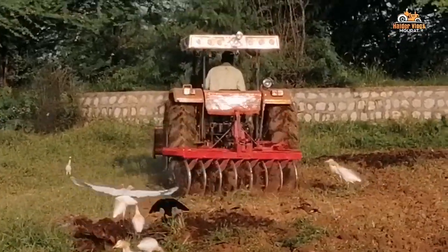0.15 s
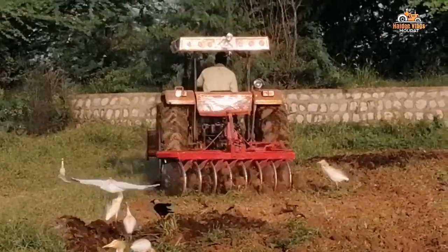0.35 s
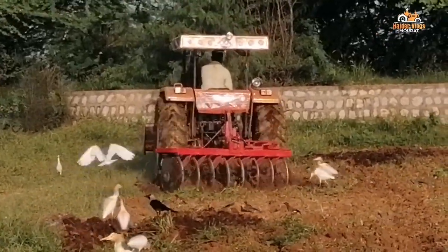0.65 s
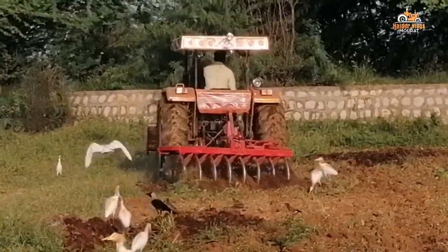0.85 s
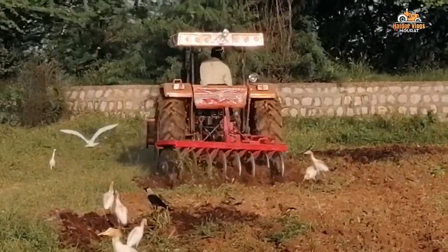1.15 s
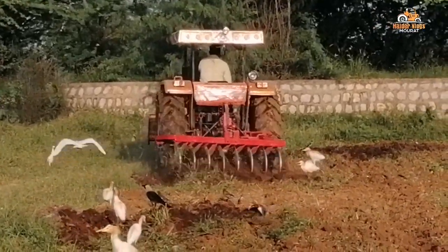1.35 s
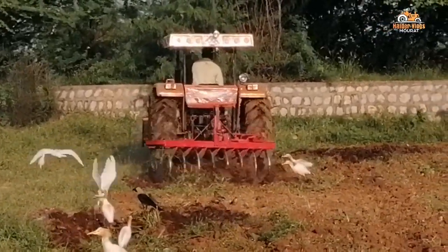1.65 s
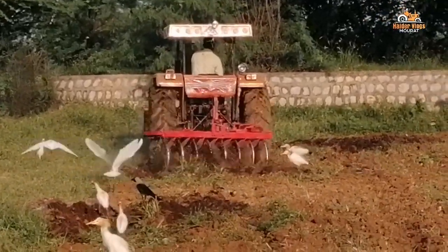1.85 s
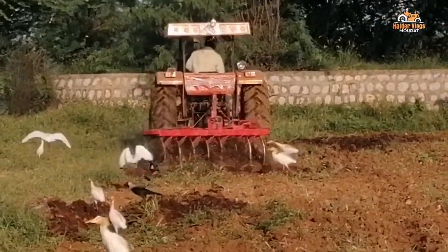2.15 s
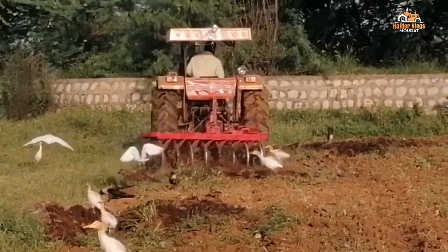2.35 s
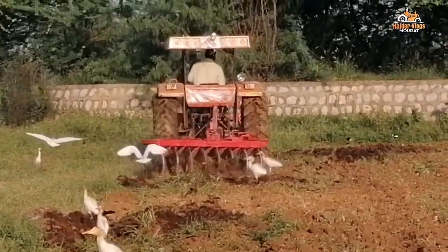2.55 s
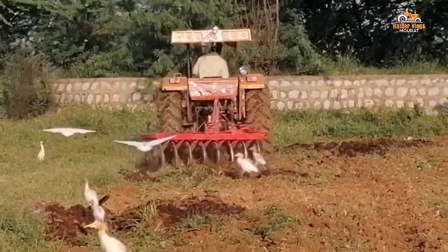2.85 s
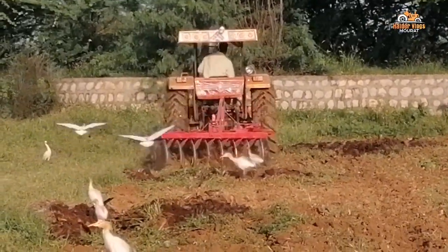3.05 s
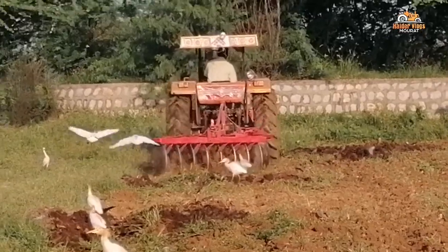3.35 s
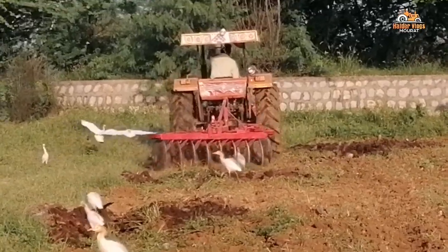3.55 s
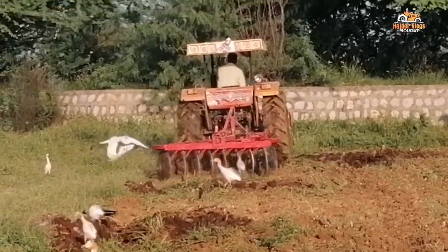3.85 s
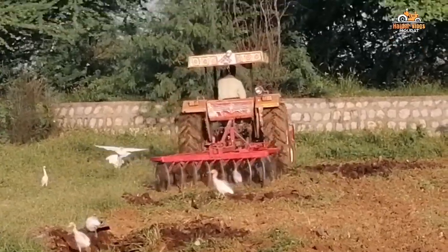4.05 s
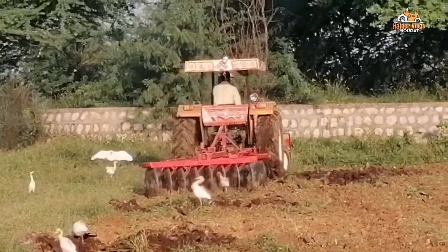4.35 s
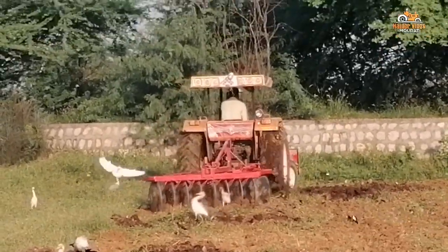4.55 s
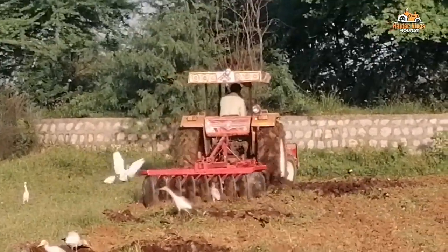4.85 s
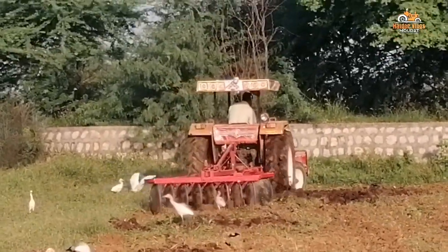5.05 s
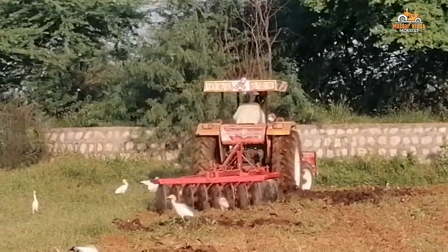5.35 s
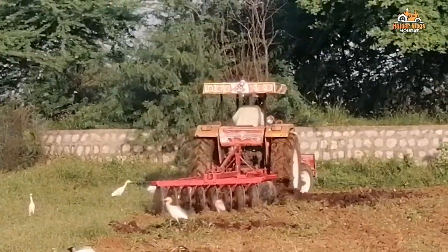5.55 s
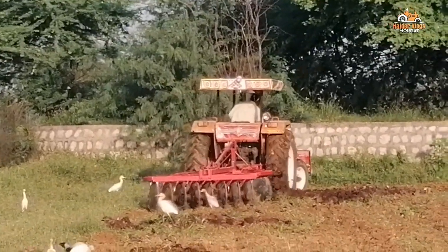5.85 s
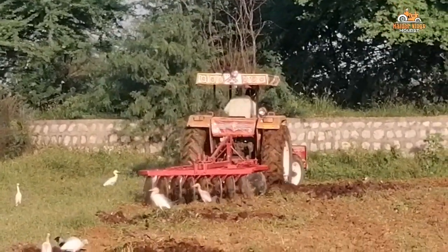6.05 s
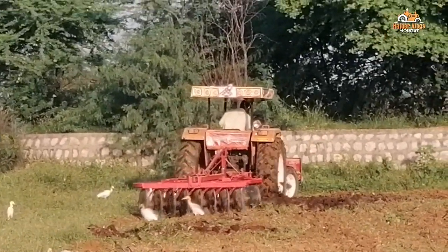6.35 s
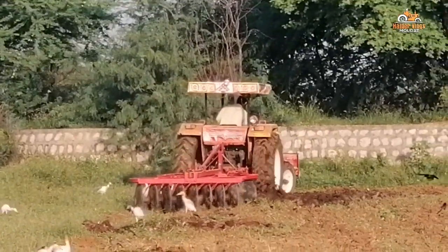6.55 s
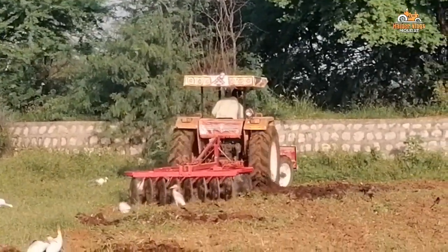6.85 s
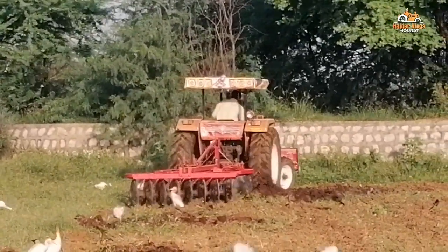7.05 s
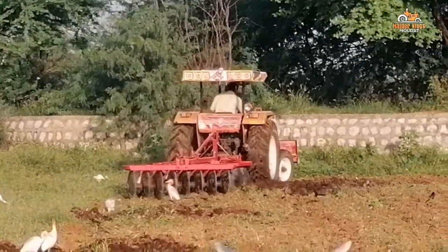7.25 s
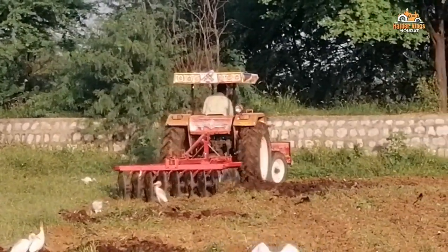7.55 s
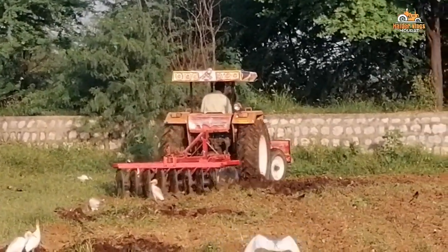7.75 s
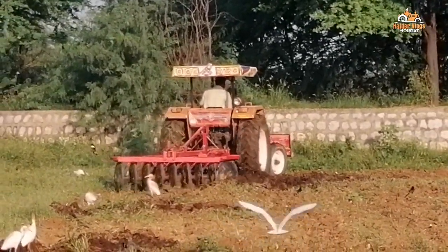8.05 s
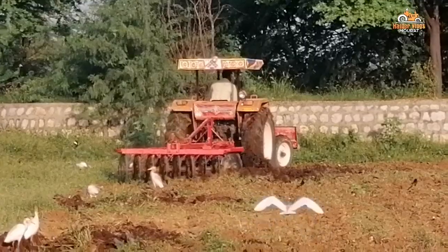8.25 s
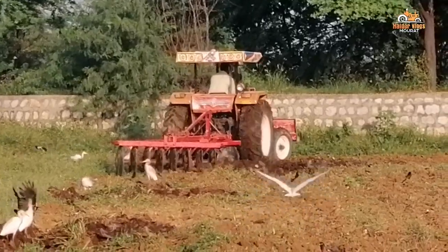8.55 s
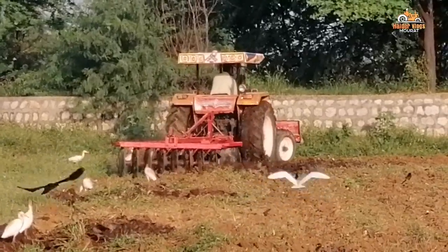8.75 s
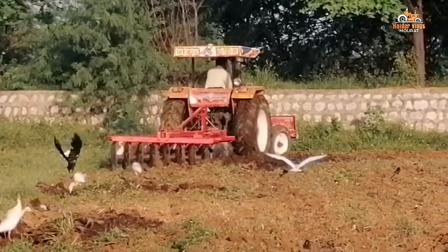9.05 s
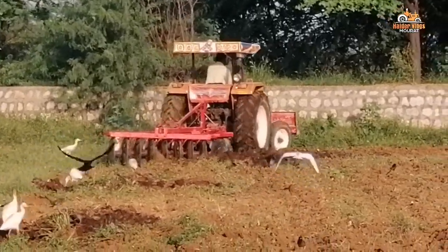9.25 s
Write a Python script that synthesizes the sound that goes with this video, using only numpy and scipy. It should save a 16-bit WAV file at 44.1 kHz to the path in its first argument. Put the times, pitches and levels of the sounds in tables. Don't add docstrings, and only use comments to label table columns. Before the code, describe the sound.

From 0 to about 9.4 seconds a three-cylinder diesel tractor works under load in an open field, dragging a disk harrow. A deep hum at roughly 39 firings per second slowly throbs against its echo from a wall, over soft low rumble, uneven block knocks and a rough roar puffing with each firing, with light hiss above. Small distant birds chirp sparsely between 0.1 and 2.8 seconds, short hoarse slides. At 4.5 to 4.7 seconds the disks crunch grittily over stones, with small pings and a bright clank, and the frame gives a soft low thud. The tractor gradually turns side-on from 4.6 to 7.4, its hiss slightly brighter. A nearer, harsh multi-syllable bird call comes around 6.5. Near 8 seconds the engine eases, sinking in pitch and roar, then pulls again from 8.9, slower. Handheld camera stereo sounds midrange-heavy, uneven between sides.

```python
import sys
import numpy as np
from scipy import signal
from scipy.fft import rfft, irfft, next_fast_len
from scipy.io import wavfile
from scipy.ndimage import map_coordinates

SR = 44100
rng = np.random.default_rng(int(sys.argv[2]) if len(sys.argv) > 2 else 0)


def invert_db(level):
    return 10 ** (np.asarray(level, dtype=float) / 20)


def waveform_to_disk(signal):
    frames = np.transpose(np.atleast_2d(signal))
    scaled = np.clip(frames, -1, 1) * 32767
    samples = np.round(scaled).astype(np.int16)
    wavfile.write(sys.argv[1], SR, samples)


N = 414528
CYLINDERS = 3


def evened(x):
    return x / np.sqrt(np.mean(x ** 2) + 1e-20)


def read(points, hz):
    f, value = np.transpose(points)
    return np.interp(np.log(hz + 1), np.log(f + 1), value)


def columns(rows, t):
    s, *rest = np.transpose(rows)
    return [np.interp(t, s, c) for c in rest]


def drift(top_hz, size=N):
    t = np.linspace(0, N / SR, 6000)
    slow = map_coordinates(rng.standard_normal(6000), [t * 2 * top_hz], order=3, mode="wrap")
    return np.interp(np.linspace(0, N / SR, size), t, evened(slow))


def resonate(x, hz, width):
    r = np.exp(-np.pi * width / SR)
    return 2 * signal.lfilter([1 - r], [1, -r * np.exp(2j * np.pi * hz / SR)], x).real


# t/s, shortening/cm
WALL = [(0, -50), (.15, 0), (.7, 341), (1.95, 621), (2.85, 913), (4.0, 1217), (5.6, 1495), (6.3, 1566),
        (7.0, 1630), (7.7, 1717), (7.9, 1775), (8.15, 1896), (8.7, 2004), (9.15, 2058), (9.4, 2105)]


def wall_echo(t, order, share, offset):
    firing_hz, sound_speed, growth_per_s = 38.8, 343, 0.14
    waves = order * columns(WALL, t)[0] / 100 * firing_hz / sound_speed
    strength = np.clip(share * (1 + growth_per_s * t), 0, .9)
    return strength * np.exp(2j * np.pi * (waves + offset))


WAVER_DB = [.7, .35, 0.65, 2.1]
# multiple of the cycle rate, level/dB
BETWEEN = [(2, -60), (4, -63), (5, -61), (7, -57.5), (8, -60.5), (10, -65), (11, -54), (13, -62.5),
           (14, -70.5), (15, -66)]


def exhaust(turns, orders_db, echoes):
    turns, size = turns[::16], N // 16
    hum = 0
    for k, (db, echo) in enumerate(zip(orders_db, echoes), 1):
        wave = np.exp(2j * np.pi * k * turns + .5j * (k * k - 1))
        wavering_db = db[::16] + WAVER_DB[k - 1] * drift(5, size)
        hum = hum + invert_db(wavering_db) * (wave * (1 + echo[::16])).real
    for k, db in BETWEEN:
        angle = 2 * np.pi * k * turns / CYLINDERS
        hum = hum + invert_db(db + 3.4 * drift(3, size)) * np.cos(angle + 1.73 * drift(1.5, size))
    return np.sqrt(2) * signal.resample_poly(hum, 16, 1, padtype="line")


KNOCK_SIZES = [5, -1.5, 0]
KNOCK_LATE = [0, 0.067, 0.1237]
# f/Hz, width/Hz, level/dB
BLOCK = [(170, 44, -12), (300.4, 71, -1.5), (375.5, 143, 1.5), (673, 43, -14.5)]


def knock(turns, db):
    blows = 0
    for k, (size_db, late) in enumerate(zip(KNOCK_SIZES, KNOCK_LATE)):
        count = np.floor((turns - k - .4 - late) / CYLINDERS).astype(int) + 1
        size_db = size_db + 0.59 * rng.standard_normal(400)[count]
        struck = np.diff(count, prepend=count[0]) > 0
        blows = blows + struck * invert_db(size_db)
    ring = 0
    for hz, width, block_db in BLOCK:
        body = resonate(resonate(blows, hz, width), hz, 1.43 * width)
        ring = ring + invert_db(block_db) * body / width * 60
    return invert_db(db - 1.0) * evened(ring)


def rumble():
    low = resonate(resonate(rng.standard_normal(N), 103, 85), 109, 150)
    return invert_db(-52.5) * evened(low)


def repeating(turns, change_hz):
    patterns = rng.standard_normal((3400, 2))
    at = (turns / CYLINDERS % 1 * len(patterns)).astype(int)
    a = 2 * np.pi * change_hz * np.arange(N) / SR
    return patterns[at, 0] * np.cos(a) + patterns[at, 1] * np.sin(a)


PUFF_SIZES = [0.92, 1.1, 0.93]


def puffed(turns, layers):
    size = next_fast_len(N)
    hz = np.fft.rfftfreq(size, 1 / SR)
    loose = rfft(rng.standard_normal((2, size)))
    locked = rfft(repeating(turns, change_hz=0.3503), size)
    out = 0
    for bands, level_db, flicker_db in layers:
        for low_hz, high_hz, place, depth_db, trim_db, share in bands:
            phase = turns - place + 3
            count, part = phase.astype(int), phase % 1
            strength = np.resize(PUFF_SIZES, 1000) * rng.uniform(0.71, 1.23, 1000)
            shape = np.exp(-part / 0.39) - np.exp(-part / 0.05)
            puff = 1.67 * shape * strength[count]
            share = np.clip(share, 0, 1)
            mix = np.sqrt(1 - share) * loose + np.sqrt(share) * locked
            band = irfft(mix * ((hz >= low_hz) & (hz < high_hz)), size)[:, :N]
            band_db = level_db + trim_db + 2 * depth_db * (puff - .5) + flicker_db * drift(13)
            out = out + band * invert_db(band_db)
    return out


# t/s, firing f/Hz, load level/dB
ENGINE = [(0.0, 39.79, -42), (0.81, 37.97, -42), (1.31, 39.2, -41.8), (1.67, 38.91, -43),
          (2.77, 38.84, -42.5), (3.17, 38.71, -43.5), (4.19, 39.25, -44), (4.79, 40.1, -44),
          (5.34, 39.38, -43.5), (6.1, 39.06, -43), (6.59, 38.05, -41.5), (7.23, 38.64, -43),
          (7.65, 37.91, -41.5), (7.85, 37.67, -44), (8.11, 35.22, -48), (8.61, 33.48, -45.5),
          (9.03, 33.08, -43.5), (9.4, 33.28, -43)]
# level/dB, share of load, side-on gain/dB, coasting gain/dB
EXHAUST = [(-44, 2, -5, 8), (-32.5, 0.11, -1.9, -2.5), (-38.5, 0.27, -0.4, -0.5), (-52, -0.021, 0.2, -4)]
KNOCK = (-57, 1.05, -2, -3)
ROAR_LEVEL = (-44, 0.87, 0.03, 0.24)
HISS_LEVEL = (-62, 1.05, 3, 0.3)
ECHOES = [(.1, 0.92), (0.12, 0.092), (.31, .44), (0.036, 0.41)]
# low f/Hz, high f/Hz, puff start in the firing (0-1), puff depth/dB,
# trim level/dB, share repeating each cycle
CHUG = [(260.8, 520, 0.31, 4, -3, 0.57)]
ROAR = [(519.5, 900, 0.35, 3.4, -2.5, 0.5), (899.3, 2000, 0.553, 2.37, -0.05, 0.25),
        (1974, 3300, 0.43, 2, 0.58, 0.034)]
HISS = [(3300, 5520, 0.35, 1.8, -1.5, 0.004), (5590, 8780, 0.43, 3.03, -1.67, 0.0018)]
AIR = [(8790, 20000, 0.29, 2, -1.5, 0.0029)]
# start t/s, end t/s
TURN_S = (4.6, 7.4)
# lift t/s, feed t/s
COAST_S = (7.99, 8.93)


def tractor(t):
    usual_load_db, pedal_s = -44, 0.22
    hz, load_db = columns(ENGINE, t)
    turns = np.cumsum(hz) / SR
    side = np.interp(t, TURN_S, [0, 1])
    inside_coast_s = np.minimum(t - COAST_S[0], COAST_S[1] - t)
    coast = np.clip(inside_coast_s / pedal_s + .5, 0, 1)
    levels_db = [db + share * (load_db - usual_load_db) + side_db * side + coast_db * coast
                 for db, share, side_db, coast_db in EXHAUST + [KNOCK, ROAR_LEVEL, HISS_LEVEL]]
    *orders_db, knock_db, roar_db, hiss_db = levels_db
    echoes = [wall_echo(t, k, *row) for k, row in enumerate(ECHOES, 1)]
    air_db = -35.5 + 0.57 * (roar_db + 43.5)
    layers = [(CHUG, knock_db + 19.5, .4), (ROAR, roar_db + 8.5, .4),
              (HISS, hiss_db + 24.5, .6), (AIR, air_db, 1.1)]
    noise = puffed(turns, layers)
    return exhaust(turns, orders_db, echoes) + knock(turns, knock_db) + rumble() + noise


# start t/s, length/s, from f/Hz, to f/Hz, level/dB
CHIRPS = [(.09, 0.042, 2280, 2350, -49), (0.425, .028, 3300, 3330, -38), (0.451, .075, 3070, 3190, -37.5),
          (.697, .03, 6020, 5300, -33), (1.373, .032, 5406, 4080, -34.5), (1.396, 0.025, 4300, 3750, -38),
          (1.692, .045, 3880, 4050, -44), (2.273, .04, 4500, 4000, -40), (2.298, .07, 3500, 3272, -48),
          (2.325, .04, 3902, 3900, -48), (2.706, 0.06, 4567, 4752, -46)]
CALL = [
    (6.48, 0.061, 3750, 3450, -55),
    (6.527, .026, 3100, 2990, -36.5),
    (6.556, .072, 2890, 3129, -38.5),
    (6.621, 0.01979, 3020, 2510, -35.5),
    (6.638, .034, 2520, 2400, -31),
]


def birds(t):
    out, wobble, rasp = np.zeros(N), drift(150), drift(300)
    for rows, octave in [(CHIRPS, .12), (CALL, .8)]:
        for start, length, from_hz, to_hz, db in rows:
            on = (t >= start) & (t < start + length)
            hz = np.linspace(from_hz, to_hz, on.sum())
            a = 2 * np.pi * np.cumsum(hz * (1 + 0.017 * wobble[on])) / SR
            has_octave = (hz < 3250) & (hz > 2750)
            voice = np.sin(a) + octave * np.sin(2 * a) * has_octave
            out[on] += invert_db(db + 1.1 * rasp[on]) * signal.windows.tukey(len(a), .3) * voice
    return out + .35 * np.roll(out, round(.006 * SR))


# t/s, level/dB
CLATTER = [
    (4.49, -50),
    (4.507, -34),
    (4.535, -26.5),
    (4.565, -27),
    (4.59, -33),
    (4.6, -24),
    (4.63, -29),
    (4.65, -35),
    (4.72, -47),
]


def scrape(t):
    out, inside = np.zeros((2, N)), (t > CLATTER[0][0]) & (t < CLATTER[-1][0])
    size = inside.sum()
    grains_db = 3 * np.minimum(rng.exponential(1, size // 100 + 1), 3).repeat(100)[:size]
    grit = rng.standard_normal((2, size)) * invert_db(grains_db)
    grit = signal.lfilter(*signal.butter(2, [1800, 10000], "band", fs=SR), grit)
    out[:, inside] = invert_db(columns(CLATTER, t[inside])[0] - 6.5) * evened(grit)
    return out


# f/Hz, level/dB, t60/s
DISKS = [(1300, -5, 0.054), (1567, 5, 0.11), (1660, -5, 0.068), (2350, 9.5, 0.057), (2950, 0, 0.04),
         (3900, 9, 0.039), (5600, 6, 0.088)]
# t/s, level/dB, first mode, mode to stop before
STONES = [
    (4.51, -39, 1, 2),
    (4.53, -35, 6, 7),
    (4.545, -32, 6, 7),
    (4.575, -35, 2, 3),
    (4.599, -34.5, 3, 6),
    (4.617, -40, 3, 5),
]


def disk_rings():
    out, age = np.zeros(N), np.arange(4000) / SR
    for s, blow_db, first, last in STONES:
        ring = 0
        for hz, db, t60 in DISKS[first:last]:
            ring = ring + invert_db(db - 60 * age / t60) * np.sin(2 * np.pi * hz * age)
        start = round(s * SR)
        out[start:start + len(age)] += invert_db(blow_db) * ring * np.minimum(age / 0.0015, 1)
    return out


# t/s, level/dB, f/Hz, t60/s
THUD = (4.6, -40, 235, .4)


def frame_thud(t):
    s, db, hz, t60 = THUD
    age = np.maximum(t - s, 0)
    thud = evened(resonate(rng.standard_normal(N), hz, 50))
    return invert_db(db - 60 * age / t60) * (1 - np.exp(-age / 0.013)) * thud


def harrow(t):
    return scrape(t) + disk_rings() + frame_thud(t)


def scene():
    t = np.arange(N) / SR
    return tractor(t) + birds(t) + harrow(t)


# f/Hz, level/dB
WHINE = (18000, -62)


def camera_whine():
    hz, db = WHINE
    return invert_db(db - 28) * np.sin(2 * np.pi * hz * np.arange(N) / SR) * [[1], [0]]


def top_cut(x):
    return signal.sosfilt(signal.butter(12, 15140, fs=SR, output="sos"), x)


# f/Hz, level/dB
LEFT_BASS = [(150, -3.5)]
LEFT_LOW = [(260, -2), (470, 3), (690, 8), (800, 1.5), (1120, 0), (1420, 7.5), (1590, 0.5), (1980, 2),
            (2410, -0.5), (2630, -7), (2800, -1), (2930, -8), (3100, -24), (3270, -31)]
LEFT_HIGH = [(3400, -13.5), (3880, -7), (4220, -13), (4570, -10), (5810, -16), (6370, -16.5), (7320, -35),
             (9040, -24), (9400, -28.5), (10300, -30), (11630, -38.5), (13350, -29), (14300, -34),
             (14990, -34)]
RIGHT_BASS = [(150, 2.25)]
RIGHT_LOW = [(260, -0.5), (340, 7.5), (470, -1), (690, 12.5), (950, 4), (1250, 10.5), (1420, -1),
             (1680, 10.5), (1980, -14), (2410, -3.5), (2580, -8), (2930, 3), (3190, -13), (3270, -12)]
RIGHT_HIGH = [(3400, -9.5), (4350, -17), (5510, -16), (5990, -7.5), (7670, -17), (8740, -16), (9780, -36.5),
              (10510, -27.5), (10850, -28), (11630, -39), (13700, -41), (14990, -35)]
# f/Hz, likeness (0-1)
SAME = [(90, 0.97), (1810, 0.89), (1980, 0.0), (2240, 0.76), (2540, 0.0), (2670, 0.96), (2800, 1.0),
        (2930, 0.73), (3060, 0.26), (3270, 0.14), (3490, 0.64), (3660, 0.0), (4200, 0.0), (6000, 0.32),
        (7500, 0.5), (9400, 0.2), (11000, 0.7)]
# f/Hz, phase/rad
LEAD = [(220, 0.0), (430, 0.5), (650, 0), (1340, 2.5), (1420, 1.23), (1510, 1), (1890, 3), (2070, 6.5),
        (2540, 8.5), (2580, 6), (3010, 7), (3140, 12), (3270, 10.5)]


def record(dry):
    size = next_fast_len(N + 4096)
    hz = np.fft.rfftfreq(size, 1 / SR)
    direct, scattered = rfft(dry, size)
    same = np.clip(read(SAME, hz), 0, 1)
    lead = read(LEAD, hz) + 2 * np.pi * 0.00064 * np.maximum(hz - LEAD[-1][0], 0)
    left = (same * direct + 1j * np.sqrt(1 - same ** 2) * scattered) * np.exp(1j * lead)
    left = left * invert_db(read(LEFT_BASS + LEFT_LOW + LEFT_HIGH, hz))
    right = direct * invert_db(read(RIGHT_BASS + RIGHT_LOW + RIGHT_HIGH, hz))
    ports = irfft(np.array([left, right]), size)[:, :N]
    return top_cut(ports + camera_whine())


dry = scene()
out = record(dry)
waveform_to_disk(out)
```